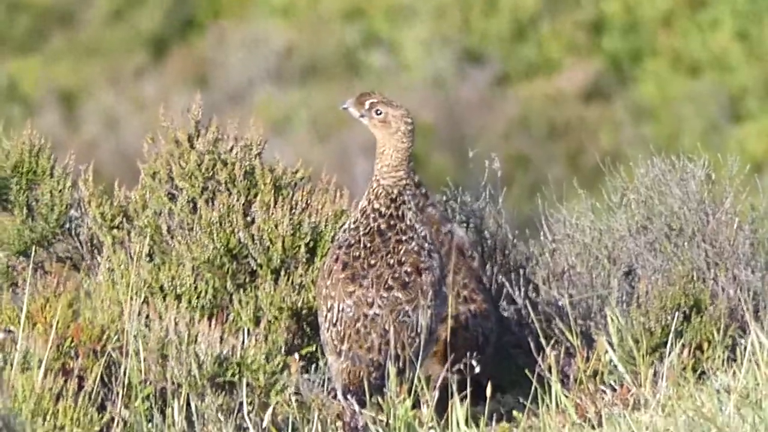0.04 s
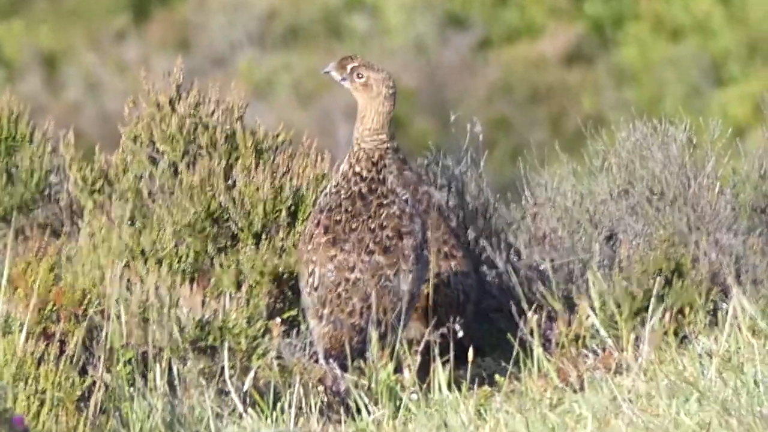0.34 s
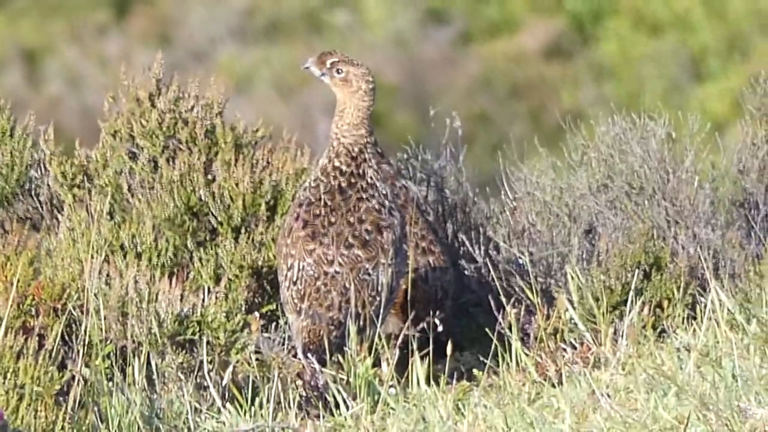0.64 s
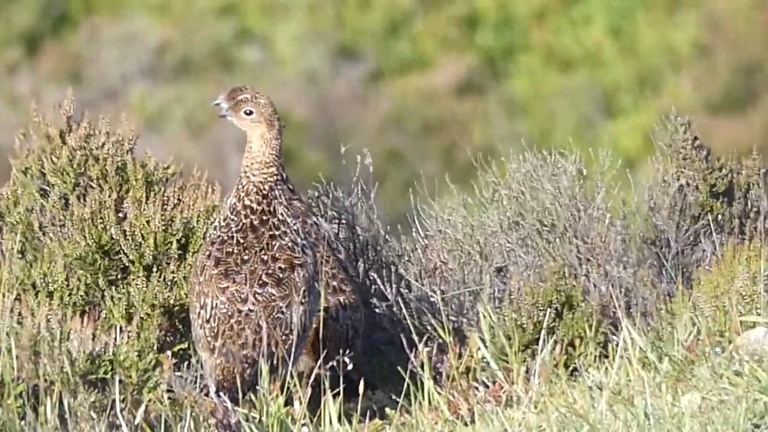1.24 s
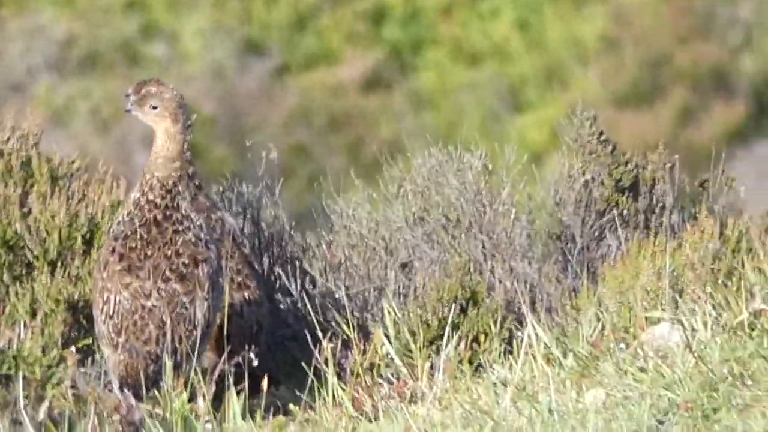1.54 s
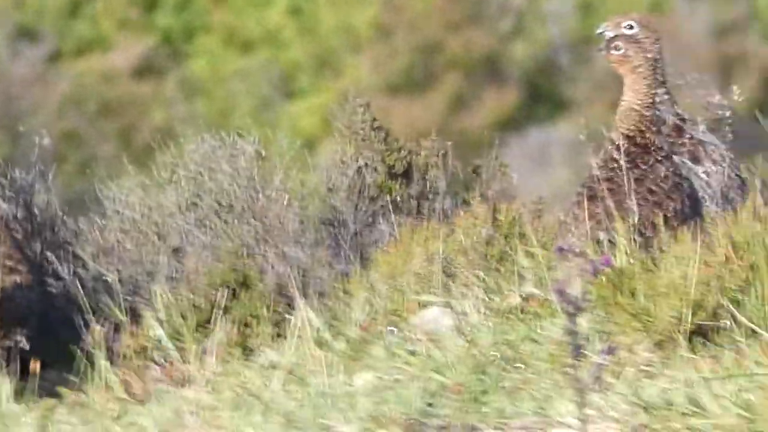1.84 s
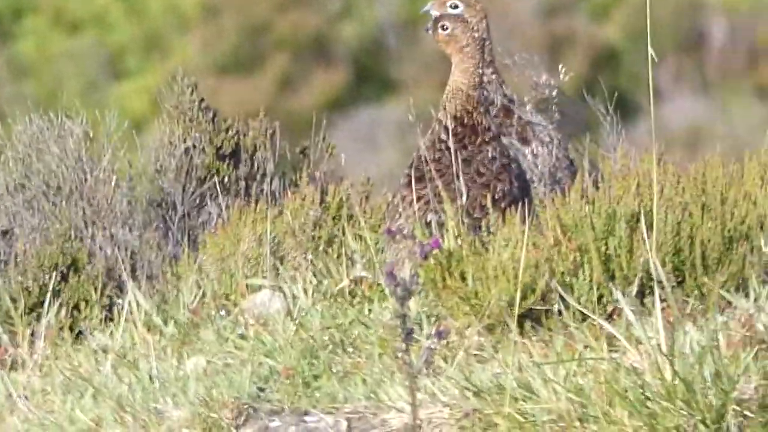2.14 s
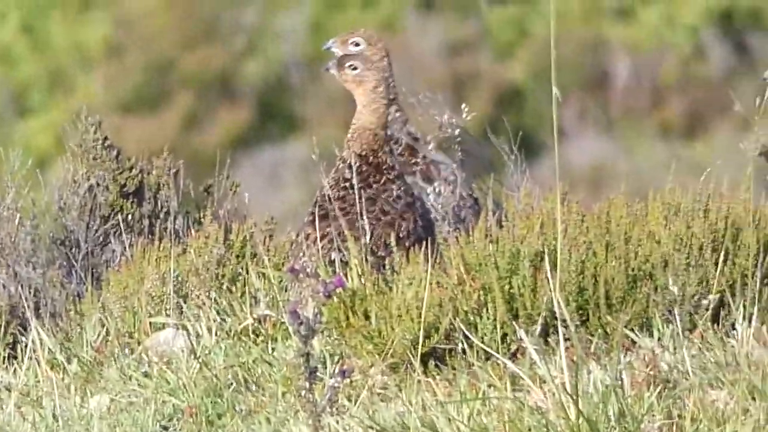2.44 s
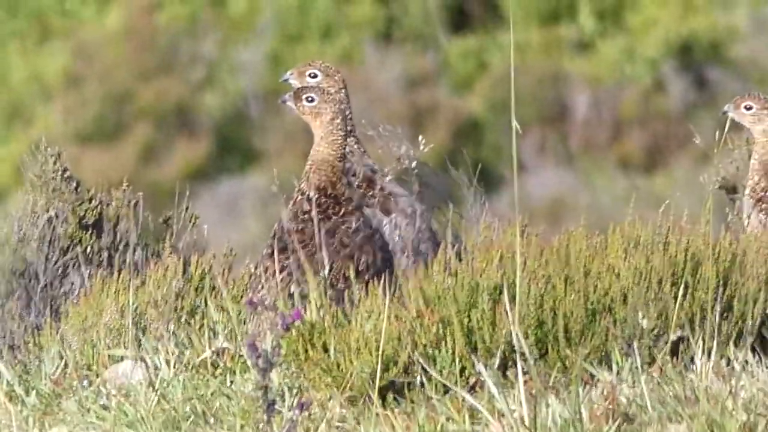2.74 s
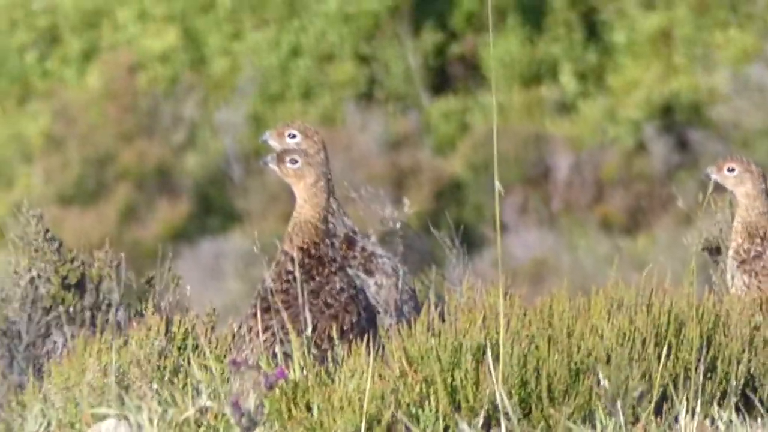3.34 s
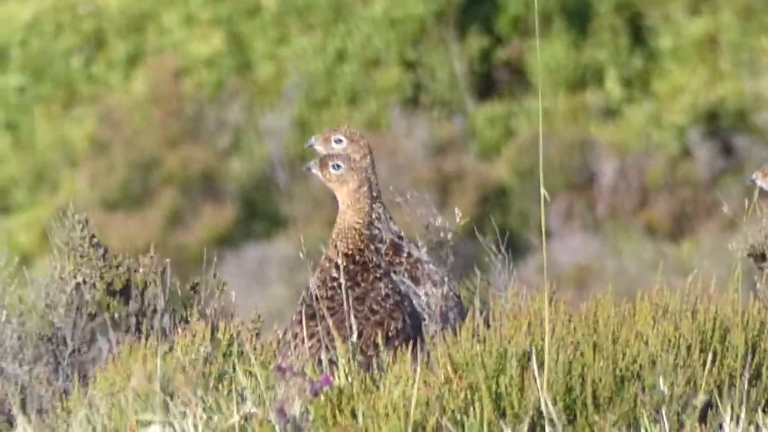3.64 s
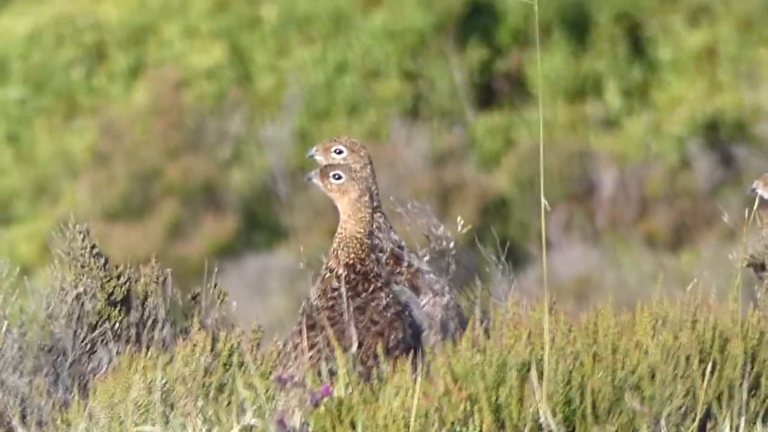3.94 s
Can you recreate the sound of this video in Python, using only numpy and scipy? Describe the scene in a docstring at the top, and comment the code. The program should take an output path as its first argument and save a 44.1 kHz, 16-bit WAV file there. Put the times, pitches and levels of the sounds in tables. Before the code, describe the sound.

Thin, high songbird whistles and a short trill sound outdoors, then stop, while a hollow camera whirr carries on right at the microphone. Midway comes a muffled handling rub and thump, with faint rumble and hiss underneath.

```python
"""On open moorland a small songbird sings one thin phrase: whistles, slurs and a quick ticking trill,
each a pure tone gliding in frequency, faintly scattered by the hillside. Close to the microphones a
camera body whirrs hollowly as a restless drive, probably its lens stabiliser, excites its resonances.
Halfway through, a hand shifts on the camera with a dull friction rub and a few soft bumps.
A faint low rumble and hiss lie underneath."""
import sys
import numpy as np
from scipy import signal
from scipy.fft import rfft, irfft, next_fast_len
from scipy.io import wavfile
from scipy.ndimage import uniform_filter1d, map_coordinates

SR = 44100
rng = np.random.default_rng(int(sys.argv[2]) if len(sys.argv) > 2 else 0)


def persist_wave(psi):
    """Save psi, clipped to +-1, as 16-bit WAV."""
    counts = np.round(np.clip(psi, -1, 1) * 32767).astype(np.int16)
    wavfile.write(sys.argv[1], SR, np.atleast_2d(counts).T)


N = 176400

# Spectra of the background noise (frequency [Hz], relative density [dB])
RUMBLE_SPECTRUM = [(20, 4.5), (35, 0.5), (55, -6), (90, -4), (120, 0.5), (150, -2.5), (180, -2), (222, 5.5),
                   (265, 1.5), (330, 1), (450, -36), (800, -72)]
HISS_SPECTRUM = [(500, 0), (3000, -3), (4200, -1), (5500, -1), (7800, -4.5), (8350, -9), (8800, -3.5),
                 (10000, -2), (12000, -8), (15400, -14)]
# Likeness of left and right, for the rumble and for other noise (frequency [Hz], correlation [-1 to 1])
RUMBLE_CORRELATION = [(60, -0.78), (150, -0.46), (230, -0.27), (320, -0.46)]
CORRELATION = [(60, .85), (200, 0.46), (400, 1), (1500, 0.16), (4000, 0.27), (7000, 0.53), (15000, 0.26)]

# Modes of the camera body (frequency [Hz], bandwidth [Hz], relative left level [dB], right level [dB])
BODY_MODES = [(400.8, 17, -59, -58.5), (440, 35.5, -51.5, -52.3), (508.4, 28, -45, -59),
              (585, 27, -56, -78), (634, 41, -61.5, -60), (737, 36, -66, -61.5),
              (785.6, 52.3, -50.5, -69.7), (873, 27, -61, -65.5), (953.5, 43, -59.5, -66),
              (1075.4, 40, -58.5, -65.5), (1140, 48, -59.5, -76), (1279.5, 27, -60, -62),
              (1357, 70, -67.4, -77), (1453, 49, -63.5, -65.5), (1539, 25, -63, -71),
              (1652.5, 70, -61.5, -62.5), (1699, 58, -69.5, -65), (1935, 53, -80.5, -78.5),
              (2117, 49, -72.5, -86), (2286, 62, -81, -74.5), (2428, 48, -72.5, -78.5)]
# Phase by which the left microphone leads the right (frequency [Hz], phase [rad])
LEFT_LEAD = [(440, -1.1), (510, -.4), (600, -3.3), (710, -3.2), (780, -.8), (950, -1.2), (1320, -2.6),
             (1660, -1.5), (2400, -1.8)]
# Contour of the whirr, before its swings are compressed (time [s], relative level [dB])
WHIRR_CONTOUR = [(0.0, -47.5), (0.27, -46), (0.37, -53), (0.38, -46), (0.6, -47.5), (0.73, -56.5),
                 (0.76, -48), (0.97, -51.5), (1.0, -44), (1.2, -50), (1.34, -44.5), (1.46, -55.5),
                 (1.48, -46.5), (1.5, -47.5), (1.61, -46), (1.66, -49.5), (1.7, -39), (1.73, -51),
                 (1.74, -47), (2.05, -45.5), (2.07, -56.5), (2.09, -39.5), (2.14, -52.5), (2.16, -40),
                 (2.21, -46.5), (2.45, -46.5), (2.47, -50.5), (2.51, -44), (2.67, -47.5), (3.48, -46.5),
                 (3.52, -50), (3.7, -46), (3.71, -43), (3.79, -55), (3.81, -47), (3.83, -46), (3.89, -45),
                 (3.92, -52.5), (3.94, -45), (4.0, -52.5)]
# Sharp jolts of the drive (time [s], level relative to the steady drive [dB])
DRIVE_JOLTS = [(0.916, 13), (1.224, 7.5), (1.277, -1.5), (1.474, 7), (2.865, 11), (2.994, 6), (3.096, -0.5),
               (3.433, 8), (3.805, 9)]
# Bright edge of the whirr (frequency [Hz], relative density [dB])
EDGE_SPECTRUM = [(300, -31), (900, -4.5), (2000, -4), (2550, -6.5), (2740, -1), (3300, -6.5), (3720, -8.5),
                 (4200, -16.5), (7000, -24)]

# Envelope of the hand's rub (time [s], level [dB])
RUB_ENVELOPE = [(1.93, -75), (1.955, -49), (1.98, -54), (2.055, -54.5), (2.09, -36.5), (2.125, -31.5),
                (2.142, -64), (2.23, -60), (2.3, -76)]
# Spectra of the dull rub and the light brushing (frequency [Hz], relative density [dB])
RUB_SPECTRUM = [(25, -30), (45, -19), (70, -3.5), (115, 3), (195, 2), (260, -10), (500, -21), (1200, -44),
                (4000, -72)]
BRUSH_SPECTRUM = [(1200, -35), (2200, 2), (2800, 8), (3400, -4), (6000, -30), (12000, -60)]
# Soft bumps on the body (time [s], envelope peak [dB], frequency [Hz])
HAND_BUMPS = [(.77, -62.5, 70), (1.956, -40, 100), (2.126, -26, 112)]
# Brushing as the hand moves and settles (time [s], Gaussian half width [s], level [dB])
HAND_BRUSHES = [(1.95, 0.11, -72), (2.168, 0.024, -64)]

# Whistled notes (start [s], length [s], relative level [dB], crest [0-1], five evenly timed pitches [Hz])
SONG_NOTES = [(-.03, .137, -68.5, .45, 7050, 7050, 7040, 6950, 6150),
              (.155, .076, -60, .28, 5480, 5030, 4480, 4060, 3920),
              (.192, .026, -76, .6, 7200, 7250, 7100, 6600, 5900),
              (.279, .063, -55, .73, 5850, 6230, 5860, 5290, 5280),
              (.568, .031, -49.3, .58, 5650, 5430, 5440, 5570, 5800),
              (.645, .086, -60.3, .45, 3560, 3605, 3610, 3585, 3560),
              (.795, .205, -67.5, .17, 7700, 7470, 7490, 7480, 7490),
              (1.043, .046, -56.5, .33, 6050, 5500, 4920, 4440, 4250),
              (1.124, .044, -61.7, .42, 5950, 5510, 4990, 4510, 4280),
              (1.295, .065, -75, .75, 6900, 6760, 6800, 6680, 6100)]


def amp(db):
    """Amplitude ratio of a level in decibels."""
    return 10 ** (np.asarray(db) / 20)


def unit(x):
    """Normalisation to an rms of 1."""
    return x / np.sqrt(np.mean(x ** 2) + 1e-20)


def along(points, hz):
    """Interpolation of (frequency, value) points on a logarithmic frequency axis."""
    frequencies, values = np.transpose(points)
    return np.interp(np.log(hz + 1), np.log(frequencies + 1), values)


def curve(rows):
    """Linear interpolation of (time, value) points at every sample."""
    return np.interp(np.arange(N) / SR, *np.transpose(rows))


def wobble(rate_hz):
    """Smooth random modulation: a spline through rate_hz Gaussian values a second."""
    return map_coordinates(rng.standard_normal(2048), [np.arange(N) * rate_hz / SR], mode="wrap")


def noise(spectrum, correlation=CORRELATION):
    """Partially coherent stereo noise of rms 1: the ratio of mid to side sets the correlation."""
    hz = np.fft.rfftfreq(N, 1 / SR)
    angle = np.arccos(np.clip(along(correlation, hz), -1, 1)) / 2
    coloured = rfft(rng.standard_normal((2, N))) * amp(along(spectrum, hz))
    mid, side = irfft(coloured * [np.cos(angle), np.sin(angle)], N)
    return unit(np.array([mid + side, mid - side]))


def air(rumble_db=-63.5, hiss_db=-73):
    """Ambient noise: an amplitude-modulated rumble, stronger on the left, under a steady hiss."""
    rumble = unit(amp(2.3 * wobble(14)) * noise(RUMBLE_SPECTRUM, RUMBLE_CORRELATION))
    return amp(rumble_db) * rumble * amp([[3], [-3]]) + amp(hiss_db) * noise(HISS_SPECTRUM)


def camera_whirr(swing=0.74, steadiness=0.47, jitter_db=2, jolt_s=0.0023):
    """Forced resonance: a jolting drive rings body modes, each with its own level and phase per side."""
    t, hz = np.arange(N) / SR, np.fft.rfftfreq(N, 1 / SR)
    contour_db = curve(WHIRR_CONTOUR)
    envelope = amp(swing * (contour_db - contour_db.mean()))
    jolts = sum(amp(db) * np.exp(-((t - time) / jolt_s) ** 2) for time, db in DRIVE_JOLTS)
    drive = amp(jitter_db * wobble(150)) + jolts
    modes = np.zeros((2, N))
    for centre, width, left_db, right_db in BODY_MODES:
        band = width / np.sqrt(np.sqrt(2) - 1)  # two resonators in cascade narrow this back to width
        response = (1j * hz * band / (centre ** 2 - hz ** 2 + 1j * hz * band)) ** 2
        ring = np.fft.ifft(rfft(drive * rng.standard_normal(N)) * response, N)  # analytic signal
        power = np.abs(uniform_filter1d(np.abs(ring) ** 2, size=SR // 8)) + 1e-20
        ring = ring / power ** (steadiness / 2)  # partly evens out the mode's level
        pickup = [amp(left_db), amp(right_db) * np.exp(-1j * along(LEFT_LEAD, centre))]
        modes += np.outer(pickup, ring / np.std(ring.real)).real
    edge = unit(np.sqrt(drive) * noise(EDGE_SPECTRUM))
    return envelope * (amp(-0.6) * modes + amp(-72.5) * edge)


def handling(bump_width_cycles=0.5):
    """Friction and impact: a hand's rubbing and brushing make noise, its bumps short low pulses."""
    t = np.arange(N) / SR
    rub = amp(curve(RUB_ENVELOPE)) * noise(RUB_SPECTRUM)
    bumps = np.zeros(N)
    for time, db, hz in HAND_BUMPS:
        cycles = (t - time) * hz
        bumps -= amp(db) * np.sin(2 * np.pi * cycles) * np.exp(-.5 * (cycles / bump_width_cycles) ** 2)
    strokes = sum(amp(db) * np.exp(-.5 * ((t - time) / width) ** 2) for time, width, db in HAND_BRUSHES)
    return rub + bumps + strokes * noise(BRUSH_SPECTRUM)


def hillside_echo(song, t60_s=0.23, level_db=-23):
    """Diffuse scattering: convolution with exponentially decaying noise gives a faint stereo tail."""
    tail = rng.standard_normal((2, SR // 2)) * amp(-60 * np.arange(SR // 2) / SR / t60_s)
    return amp(level_db) * signal.fftconvolve(song[None], tail / np.linalg.norm(tail[0]), axes=1)[:, :N]


def whistle(start, length, crest, pitches, waver):
    """Frequency modulation: a pure tone glides through its pitches, swelling to a crest and fading."""
    progress = (np.arange(N) / SR - start) / length
    sounding = (progress > 0) & (progress < 1)
    glide = np.polyfit(np.linspace(0, 1, len(pitches)), pitches, len(pitches) - 1)
    hz = np.polyval(glide, progress[sounding]) * waver[sounding]
    skewed = np.interp(progress[sounding], [0, crest, 1], [0, .5, 1])
    swell = np.abs(np.sin(np.pi * skewed)) ** .95
    note = np.zeros(N)
    note[sounding] = swell * np.sin(2 * np.pi * np.cumsum(hz) / SR)
    return note


def songbird(ticks=7, trill_start_s=.3613, tick_period_s=.029, tick_s=.0048, sweep_hz=(6500, 4500)):
    """Tonal song: slow glides are heard as whistles, very brief down-sweeps as a ticking trill."""
    waver = 1 + .0025 * wobble(140)
    notes = sum(amp(db) * whistle(start, length, crest, pitches, waver)
                for start, length, db, crest, *pitches in SONG_NOTES)
    trill = sum(whistle(trill_start_s + k * tick_period_s, tick_s, 0.56, sweep_hz, waver)
                for k in range(ticks))
    flutter = amp(-1 + .9 * wobble(100))
    song = (notes + amp(-63.5) * trill) * flutter
    return song * amp([[2.5], [-2.5]]) + hillside_echo(song)  # the bird is a little to the left


def scene():
    """Superposition: the pressures of air, camera, hand and bird add."""
    return air() + camera_whirr() + handling() + songbird()


def record(dry, low_cut_hz=43.4, top_hz=15600):
    """Band limiting: the camera cuts the deepest rumble and passes nothing above top_hz."""
    cut = signal.sosfilt(signal.butter(4, low_cut_hz, "highpass", fs=SR, output="sos"), dry)
    size = next_fast_len(N + SR // 2)
    passband = np.fft.rfftfreq(size, 1 / SR) < top_hz
    return irfft(rfft(cut, size) * passband, size)[:, :N]


dry = scene()
out = record(dry)
persist_wave(out)
```